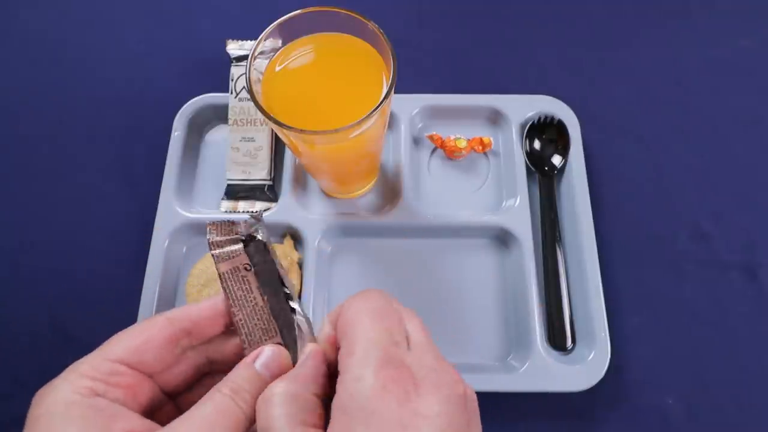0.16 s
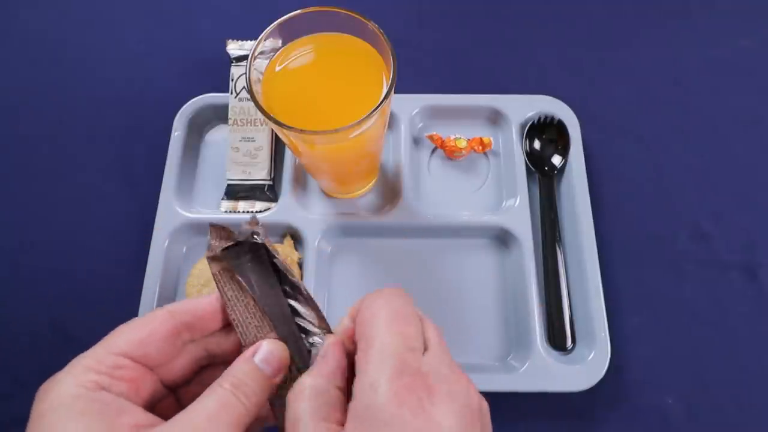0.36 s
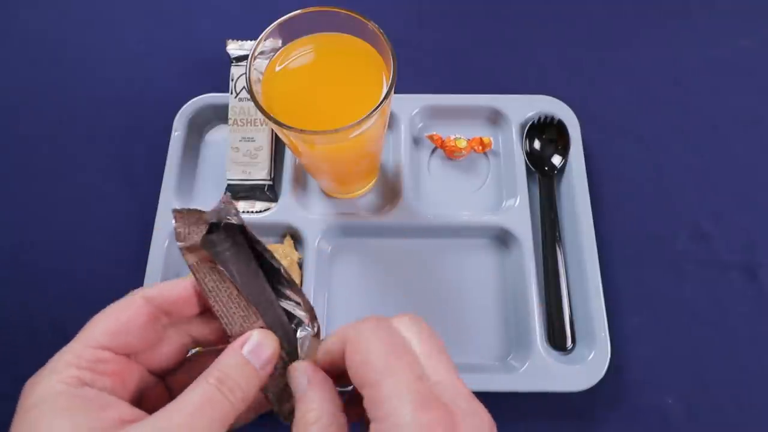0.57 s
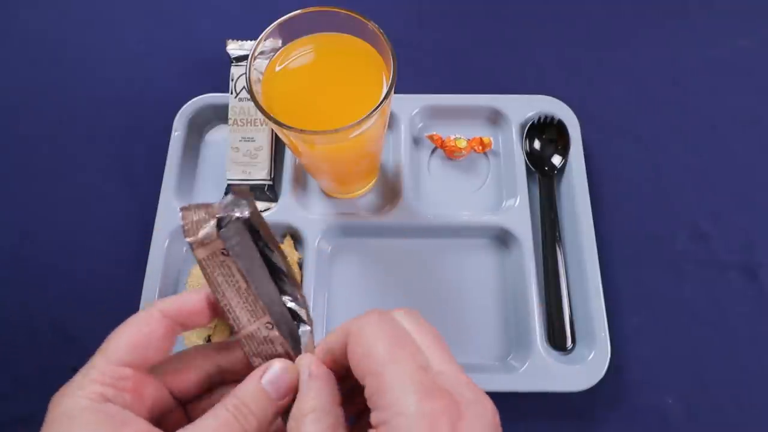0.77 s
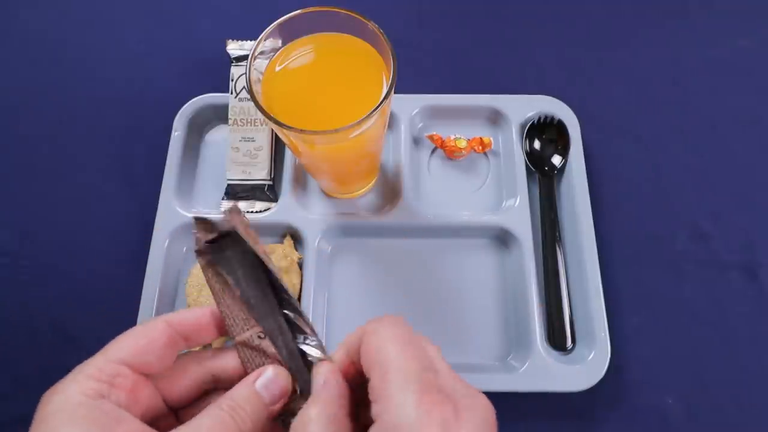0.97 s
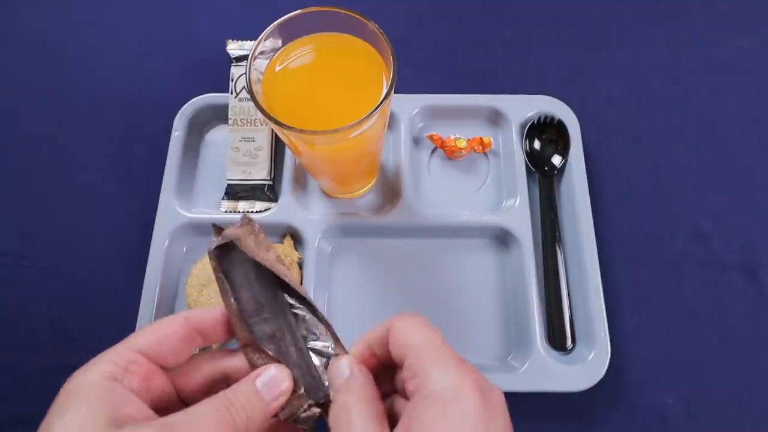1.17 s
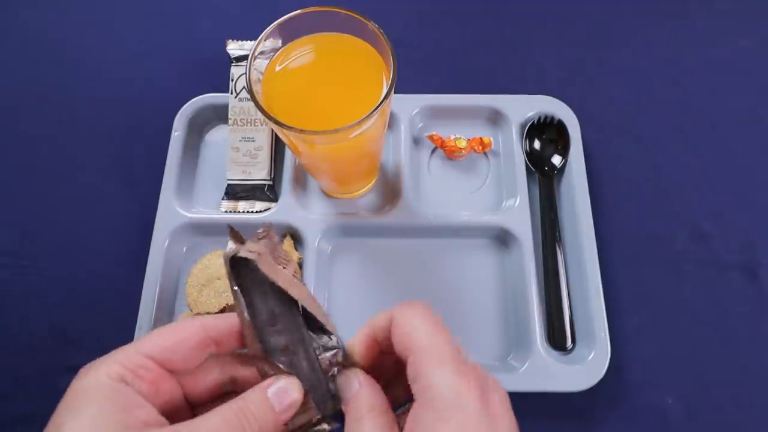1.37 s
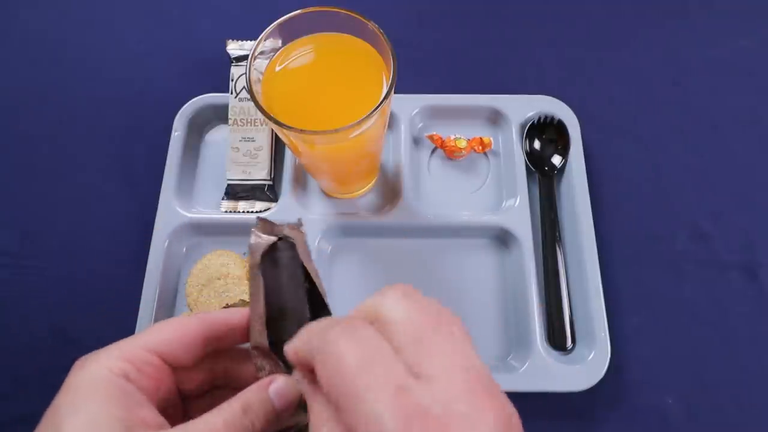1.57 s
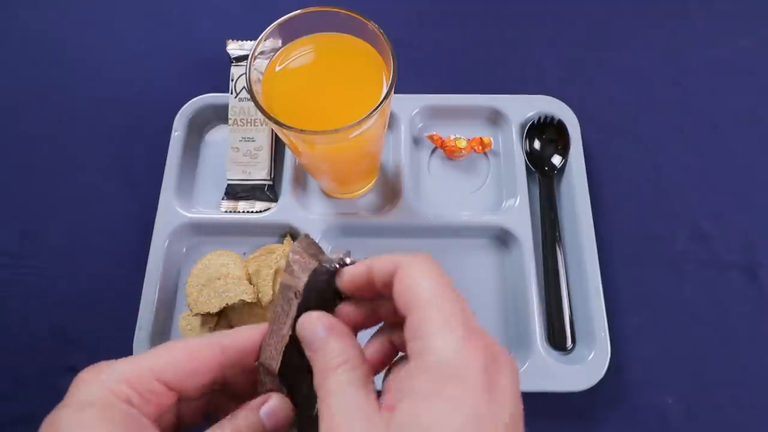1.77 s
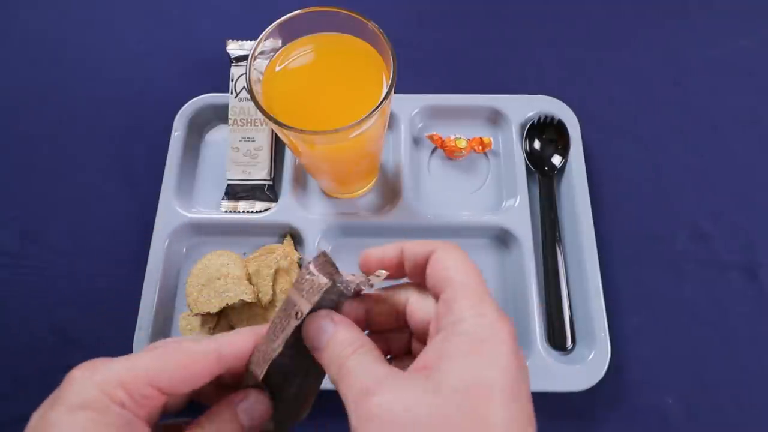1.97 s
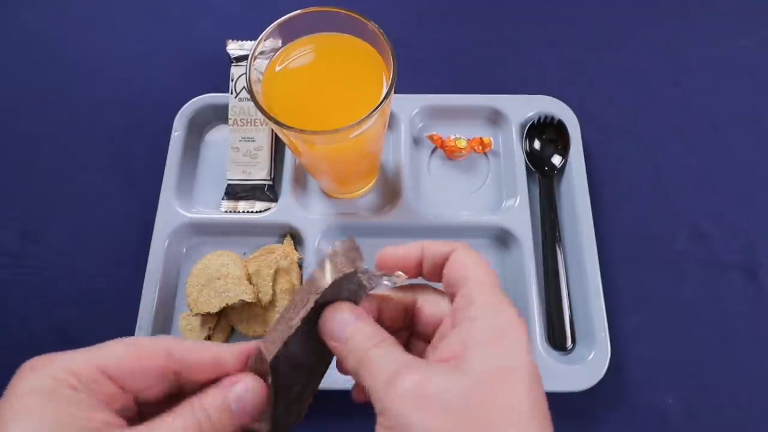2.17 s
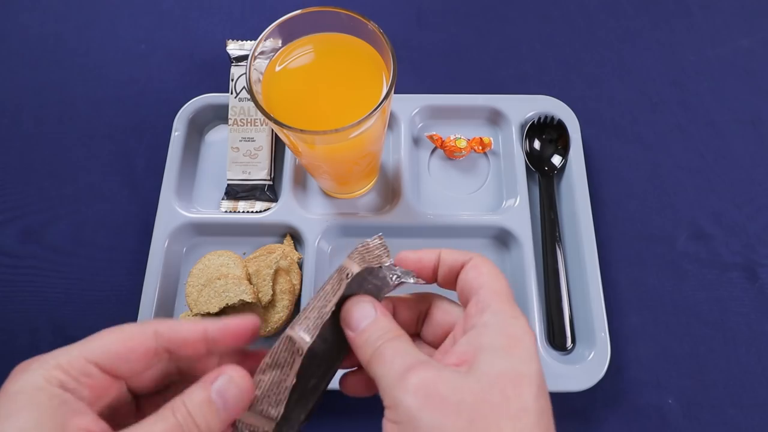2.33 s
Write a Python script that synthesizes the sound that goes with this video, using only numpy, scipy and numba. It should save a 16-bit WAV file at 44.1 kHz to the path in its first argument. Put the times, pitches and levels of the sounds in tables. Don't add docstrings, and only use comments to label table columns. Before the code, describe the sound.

Crisp, bright wrapper crinkling in three uneven tugs, close up, over very faint room hum

```python
import sys
import numpy as np
from scipy import signal
from scipy.fft import rfft, irfft
from scipy.io import wavfile
from numba import njit

SR = 44100
rng = np.random.default_rng(int(sys.argv[2]) if len(sys.argv) > 2 else 0)


def makeup_ratio(level_db):
    decades = np.asarray(level_db, float) / 20
    return 10 ** decades


def store_pcm(level_fs):
    pcm = np.round(np.clip(level_fs, -1, 1) * 32767).astype(np.int16)
    wavfile.write(sys.argv[1], SR, np.atleast_2d(pcm).T)


N = 105840

TICK = dict(hz=7680, spread=0.47, cycles=18.9)
SHEEN = dict(hz=13420, spread=0.047, cycles=8.8)


def air():
    # f/Hz, level/dB per Hz
    air_spectrum = [(25, -24), (50, 1.5), (130, -1), (300, 1), (600, -7.5), (1500, -14), (4000, -42),
                    (15000, -29)]
    # f/Hz, rms level/dB
    hum_lines = [(59.2, -71), (118.4, -72), (269.2, -71), (306.8, -74.5), (360.7, -73.5), (468.3, -81)]
    air_db, wobble_db, wobble_points = -63, 5.5, 55
    t = np.arange(N) / SR
    f = np.fft.rfftfreq(N, 1 / SR) + 1
    hz, db = np.array(air_spectrum).T
    spectrum = rfft(rng.standard_normal(N)) * makeup_ratio(np.interp(np.log(f), np.log(hz), db))
    noise = irfft(spectrum, N)
    out = noise * makeup_ratio(air_db) / noise.std()
    for hz, db in hum_lines:
        moments = np.linspace(0, N / SR, num=wobble_points)
        wobble = np.interp(t, moments, rng.standard_normal(wobble_points))
        tone = np.sin(2 * np.pi * (hz * t + rng.random()))
        out = out + np.sqrt(2) * makeup_ratio(db + wobble_db * wobble) * tone
    return out


def band(x, hz, octaves):
    edges = np.clip(hz * 2 ** (np.array([-.5, .5]) * octaves), 20, .45 * SR)
    return signal.sosfilt(signal.butter(2, edges, "band", fs=SR, output="sos"), x)


def space(x):
    # f/Hz, width/octaves, tail level/dB, t60/s
    room_bands = [(614, 0.42, 5.5, 0.19), (1290, 1, 6, 0.21), (2200, 1, 0, 0.37), (3550, 0.8, 4.5, 0.24),
                  (5500, 0.74, 2.5, 0.2), (8040, 0.23, 1.5, 0.23), (13100, 0.75, 9.5, 0.17)]
    room_db, rise_s = -9, .004
    t = np.arange(SR // 2) / SR
    tail = np.zeros(len(t))
    for hz, octaves, db, t60 in room_bands:
        tail += makeup_ratio(db - 60 * t / t60) * band(rng.standard_normal(len(t)), hz, octaves)
    tail = tail * (1 - np.exp(-t / rise_s)) * makeup_ratio(room_db) / np.sqrt(.02 * SR)
    return x + signal.fftconvolve(x, tail)[:N]


@njit
def ring(n, start, hz, t60, size):
    out = np.zeros(n)
    for k in range(len(start)):
        turn = np.exp((2j * np.pi * hz[k] - np.log(1000.) / t60[k]) / SR)
        first = int(start[k])
        phasor = (size[k] + 0j) * turn ** (first + 1 - start[k])
        for j in range(max(first + 1, 0), min(n, first + int(t60[k] * SR))):
            out[j] += phasor.imag
            phasor *= turn
    return out


def patches(s, db, hz, spread, cycles, count, loose=0, drag=1):
    travel_s, snap_s = 0.0007, 0.001128
    fade_db, off_pitch_db = 2.2, 9
    low_side = .4
    pitch, size, wait = np.moveaxis(rng.standard_normal((len(s), count, 3)), 2, 0)
    order = np.arange(count)
    after = order > 0
    late = np.abs(wait) * after
    fan = (-1) ** order * order / count
    fan = np.where(fan < 0, low_side * fan, fan)
    centre = np.reshape(hz, (-1, 1))
    detune = 2 * fan + .35 * pitch * np.maximum(after, loose)
    f = np.clip(centre * np.exp(spread * detune), 500, .45 * SR)
    share = np.where(after, np.sign(size) * (0.55 + 0.2 * np.abs(size)), 1 - .4 * loose)
    level = np.reshape(db, (-1, 1)) - fade_db * late - off_pitch_db * np.abs(fan)
    gain = makeup_ratio(level) * share
    start = (s[:, None] + travel_s + snap_s * drag * late) * SR
    t60 = cycles / np.maximum(f, centre)
    return ring(N, start.ravel(), f.ravel(), t60.ravel(), gain.ravel())


def crackle():
    # t/s, crackle level/dB
    finger_pull = [(0, -40.5), (.2, -49), (.23, -35), (.4, -37.5), (.49, -43.5), (.55, -36), (.7, -50.5),
                   (.76, -34.5), (.9, -43), (1.0, -33.5), (1.3, -33), (1.47, -36.5), (1.6, -50.5),
                   (1.73, -60), (1.78, -37), (2.05, -33), (2.18, -39.5), (2.4, -42)]
    crackle_db, crackle_hz, scatter_db, sheen_db = -11.5, 4800, 4, -16.5
    when, luck = rng.random((2200, 2)).T
    s = when * N / SR
    octaves = 0.48 * rng.standard_normal(len(when))
    pull_db = np.interp(s, *np.array(finger_pull).T)
    size_db = pull_db + crackle_db - scatter_db * np.log(luck + 0.044)
    film = patches(s, size_db, crackle_hz * 2 ** octaves, spread=0.56, cycles=10.4, count=4)
    sheen = patches(s, size_db + sheen_db, **SHEEN, count=2, loose=0.56)
    return film + sheen


def flurries():
    # t/s, length/s, level/dB, centre f/Hz
    crease_runs = [(0.293, 0.0068, -32.5, 2200), (.304, 0.019, -22.5, 4020), (.323, 0.042, -27.5, 4130),
                   (0.346, 0.0051, -56, 2000), (0.743, 0.0095, -44, 5970), (0.761, 0.007, -35, 5000),
                   (1.027, .012, -35.5, 4400), (1.0449, .005, -21, 4800), (1.055, 0.043, -33, 4200),
                   (1.2024, 0.0045, -22, 4800), (1.272, 0.034, -34, 6230), (1.406, 0.036, -46, 3160),
                   (1.784, 0.011, -33, 3500), (1.83, 0.021, -38.5, 3200), (2.05, 0.008, -43, 5200),
                   (2.129, 0.012, -33, 5100), (.07, 0.052, -50.5, 1130), (1.27, .014, -37, 14500),
                   (1.293, .013, -40.5, 1570), (.508, 0.011, -39.5, 1290)]
    tick_db, sheen_db = -10, -10
    s, length, db, hz = np.array(crease_runs, float).T[:, :, None]
    when, luck, pitch = rng.random((3, len(s), 12))
    at = (s + (np.arange(12) + when) / 12 * length).ravel()
    size_db = (db - 1.65 * np.log(luck + 0.13) + 2.5).ravel()
    ring_hz = (hz * np.exp(.7 * (pitch - .5))).ravel()
    film = patches(at, size_db, ring_hz, spread=0.3, cycles=5.4, count=4)
    tick = patches(at, size_db + tick_db, **TICK, count=4, loose=1)
    sheen = patches(at, size_db + sheen_db, **SHEEN, count=2, loose=0.76)
    return film + tick + sheen


def snaps():
    # t/s, peak level/dB, ring f/Hz, thud level/dB, tick level/dB (thud and tick relative to the peak)
    crease_snaps = [(0.022, -28.5, 5600, -29, -17.5), (0.121, -46, 5630, -30, -3),
                    (0.179, -49.5, 3800, 18, -1.5), (0.213, -24, 9000, -34, -11.5),
                    (0.218, -25.5, 2950, -20, -11), (0.28, -10, 2980, -13, -20.5),
                    (0.311, -17.5, 3060, -4, -25.5), (0.34, -25, 4900, -17, -9), (0.349, -39, 3320, -22, -9),
                    (0.3574, -10.5, 3920, -51, -25), (0.432, -32.5, 3020, -30, -17),
                    (0.495, -23.5, 2790, -6.5, -27.5), (0.513, -22.5, 3070, -3, -17.5),
                    (0.54, -33, 3400, 8, -7), (0.559, -24, 3460, -16, -13), (0.627, -38.5, 3450, 3.5, -15),
                    (0.727, -36, 2920, -9, -9), (0.749, -29.5, 3000, -27, -2), (0.77, -20.5, 5580, -8, -29),
                    (0.79, -43.5, 3560, -38, 4), (0.84, -33.5, 3430, 3, -25), (0.897, -42, 4400, -17, 2.5),
                    (0.935, -28.5, 5500, -43, -13.5),
                    (0.943, -26.5, 3110, -36, -8.5), (0.972, -29, 3430, -26, -10),
                  (1.001, -27.5, 2970, -18, -5.5), (1.046, -26.5, 2940, 9, -2.5),
                  (1.055, -21.5, 3130, 5, -12), (1.106, -15, 4300, -42, -16),
                  (1.1378, -19, 4550, -35, -14.5), (1.1812, -24.5, 3180, -27, -13),
                  (1.1935, -30, 4400, -29, -9), (1.203, -19.5, 3440, -25, -17),
                  (1.2195, -33, 4800, -20, -6), (1.259, -30.5, 6400, -35, -5), (1.295, -26, 3630, -4, -7.5),
                  (1.321, -24.5, 3400, -29, -14), (1.352, -20.5, 4120, 0.5, -14),
                  (1.364, -21, 4350, -4, -25), (1.375, -26.5, 4200, -31, -7.5),
                  (1.391, -20, 4040, -28, -25), (1.427, -25.5, 3550, -5, -41),
                  (1.443, -33, 3430, 6.5, -2.5), (1.496, -24, 4020, -8, -22.5),
                  (1.515, -18, 3050, 4.5, -22.5), (1.595, -41, 3830, 9, -6.5),
                    (1.736, -33, 3400, 9.5, -35), (1.772, -22, 3820, -8, -17), (1.841, -20, 4040, -10.5, -28),
                 (1.85, -25.5, 4370, -21, -19), (1.865, -27, 2160, -32, -10.5), (1.905, -40, 3400, -10, -2),
                 (1.914, -30.5, 4860, -29, -12), (1.9283, -22.5, 3820, -43, -9),
                 (1.945, -46, 3600, -36, -12), (1.9613, -26.5, 5400, -51, -6),
                 (1.995, -27.5, 3660, -48, -7), (2.004, -35, 2840, -33, 0), (2.0395, -23.5, 3510, -23, -15),
                 (2.054, -25, 5600, -46, -34), (2.1187, -21.5, 6330, -48, -32),
                 (2.1364, -16, 6760, -41, -28.5), (2.2051, -28.5, 5250, -46, -15),
                 (2.236, -34.5, 3600, -20, -10.5), (2.274, -28.5, 5030, -40, -12),
                 (2.309, -41, 5800, -30, -4), (2.356, -32, 3360, 1, -9.5), (2.374, -33, 3100, 1, -15),
                    (0.0616, -41.5, 4070, 2, -11), (.165, -52, 7500, -30, -4),
                      (.235, -37, 2960, -12, -24), (0.3062, -36, 3160, -10, -22),
                      (0.3197, -24, 1930, 12.5, -13), (0.332, -36, 3640, -26, -4),
                      (.3555, -20.5, 2030, -14, -30), (.648, -39.5, 2860, 5, -12.5),
                      (.805, -34.5, 2980, 1, -9), (.819, -39, 4500, -20, -17),
                      (0.8616, -34.5, 6000, -30, -24), (.912, -38.5, 1640, -22, -35),
                      (1.064, -28, 10500, -27, -12), (1.079, -37, 3300, -8, -23),
                      (1.087, -32, 3220, -2, -18), (1.096, -32, 3350, -24, -19), (1.23, -33, 3420, -4, -20),
                      (1.281, -26, 14000, -30, -11), (1.289, -43, 2200, 13, -7), (1.422, -28, 3340, 8, -16),
                      (1.874, -43, 6000, -30, -5), (1.893, -32.5, 3700, 2, -14),
                      (2.009, -28, 3260, -7, -16), (2.0365, -24.5, 2410, -4.5, -15),
                      (2.104, -50, 7000, -30, -8), (2.16, -27, 4030, -20, -29),
                      (2.219, -33, 7700, -30, -15), (2.266, -31, 3360, -4, -19),
                      (2.342, -43, 3270, -14, -10), (.4935, -32, 3020, -14, -12.5),
                      (.7655, -30.5, 2770, 4, -11), (.221, -37, 1480, 10.5, -27),
                      (1.845, -30, 905, -18, -30), (1.7915, -28, 3470, 2, -23)]
    ring_db, thud_db, tick_db, sheen_db = -5, 1, 9.5, -9.5
    tick_drag = 1.6
    creases = crease_snaps
    s, db, hz, thud, tick = np.array(creases, float).T
    film = patches(s, db + ring_db, hz, spread=0.31, cycles=30.2, count=6)
    bar = patches(s, db + thud + thud_db, hz=994, spread=0.95, cycles=1.45, count=3)
    bright = patches(s, db + tick + tick_db, **TICK, count=12, loose=1, drag=tick_drag)
    sheen = patches(s, db + tick + sheen_db, **SHEEN, count=5, loose=1, drag=tick_drag)
    return film + bar + bright + sheen


def scene():
    film = snaps() + flurries() + crackle()
    film = signal.sosfilt(signal.butter(6, 551, "high", fs=SR, output="sos"), film)
    film = signal.sosfilt(signal.butter(2, 14000, fs=SR, output="sos"), film)
    film = film + makeup_ratio(-15.5) * band(film, hz=3350, octaves=0.31)
    return (space(film) + air())[None]


def roll_off(x):
    return signal.sosfilt(signal.butter(12, 16650, fs=SR, output="sos"), x)


def record(dry):
    top = signal.ellip(8, .3, 50, 15900, fs=SR, output="sos")
    mix = signal.sosfilt(top, dry)
    return roll_off(mix)


dry = scene()
out = record(dry)
store_pcm(out)
```